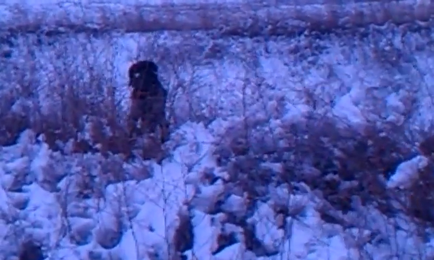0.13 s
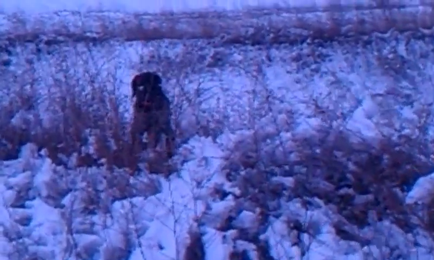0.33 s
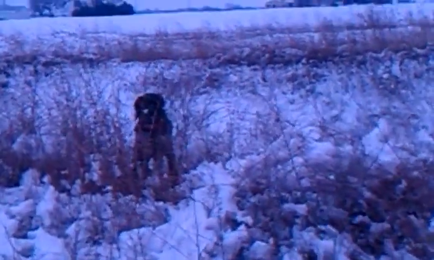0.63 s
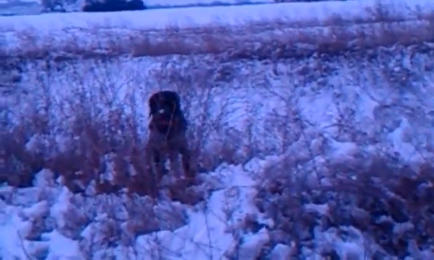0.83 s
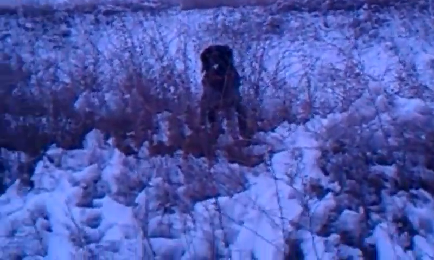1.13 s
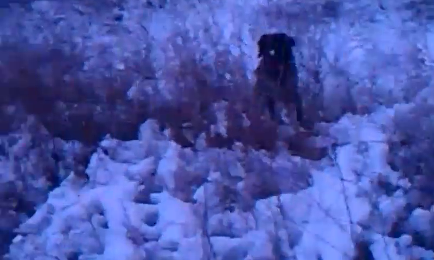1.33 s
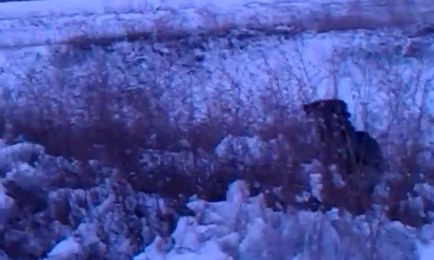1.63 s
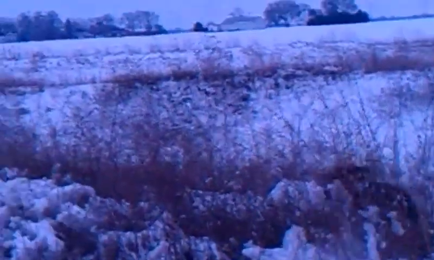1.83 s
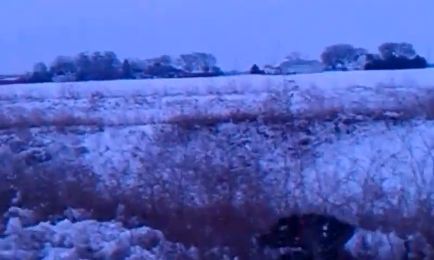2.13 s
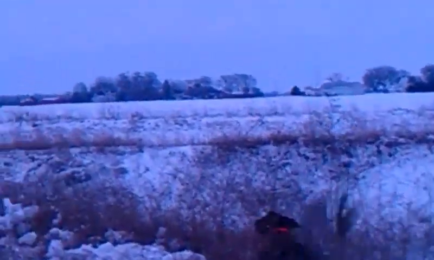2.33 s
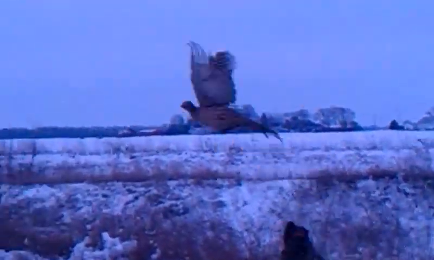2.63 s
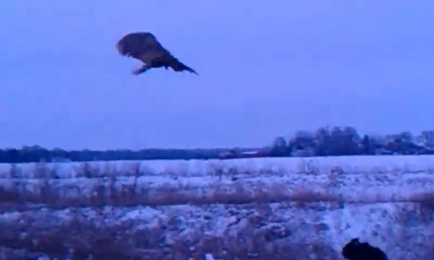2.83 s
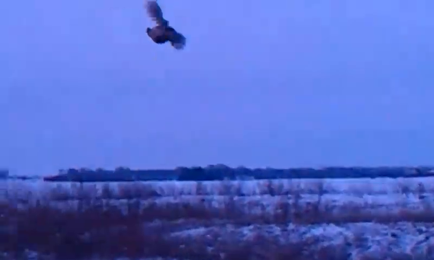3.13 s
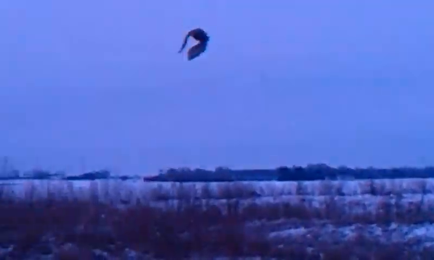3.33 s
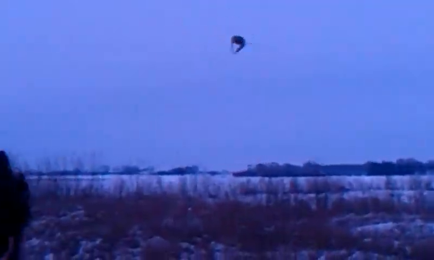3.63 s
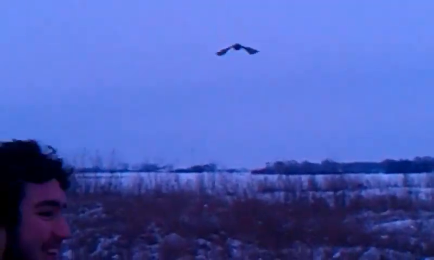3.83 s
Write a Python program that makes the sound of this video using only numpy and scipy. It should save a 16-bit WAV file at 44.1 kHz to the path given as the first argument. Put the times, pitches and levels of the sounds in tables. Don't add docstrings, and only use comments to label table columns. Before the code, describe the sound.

A pheasant's flush in an open field. Until 1.2 s, faint air hush, light rustling and a few dull knocks. From 1.2 to 2 s wings thrash dry stalks, with crackles and bright snaps, sharpest near 1.4 s. From about 1.85 s, rapid wingbeats, roughly fourteen per second, whistle in short falling chirps over low thumps. More brush rustles around 2.4-2.7 s; wingbeats fade by 3.5 s under buffeting microphone wind.

```python
import sys
import numpy as np
from scipy import signal
from scipy.fft import rfft, irfft
from scipy.io import wavfile
from scipy.ndimage import uniform_filter1d

SR = 44100
rng = np.random.default_rng(int(sys.argv[2]) if len(sys.argv) > 2 else 0)


def voltage_ratio(decibels):
    exponent = np.asarray(decibels, float) / 20
    return 10 ** exponent


def transcribe(signal):
    frames = np.atleast_2d(signal).T
    limited = np.clip(frames, -1, 1)
    pcm = np.round(limited * 32767).astype(np.int16)
    wavfile.write(sys.argv[1], SR, pcm)


N = 176400


def evened(x):
    return x / np.sqrt(np.mean(x ** 2) + 1e-20)


def curve(points):
    s, db = np.transpose(points)
    return voltage_ratio(np.interp(np.arange(N) / SR, s, db))


def colour(x, points):
    f, db = np.transpose(points)
    log_hz = np.log(np.fft.rfftfreq(N, 1 / SR) + 1)
    gain = voltage_ratio(np.interp(log_hz, np.log(f + 1), db))
    return evened(irfft(rfft(x) * gain, N))


def wander(span_s):
    size = max(int(span_s * SR), 2)
    return evened(uniform_filter1d(uniform_filter1d(rng.standard_normal(N), size), size))


def add(mix, s, sound):
    part = mix[max(round(s * SR), 0):][:len(sound)]
    part += sound[:len(part)]


def bursts(rows, rise_s, gain_db, order):
    out, t = np.zeros(N), np.arange(0, .2, 1 / SR)
    for s, db, length_s in rows:
        swell = np.minimum(t / rise_s, 1) * np.exp(-(t / length_s) ** order)
        add(out, s - rise_s / 2, voltage_ratio(db + gain_db) * swell)
    return out


# f/Hz, density/dB
AIR = [(18, -17), (30, 11.5), (103, 7), (311, -2.5), (1400, -6), (2500, -12.5), (4190, -18.5), (6500, -11),
       (8080, -27), (16000, -36)]
AIR_DB = -45.5


def hush():
    return voltage_ratio(AIR_DB + 1.0 * wander(0.011)) * colour(rng.standard_normal(N), AIR)


PATCH_DB = 2.5


def patchy(x):
    z = signal.stft(x, nperseg=256)[2]
    patches = rng.standard_normal(z.shape[::-1])
    patches = uniform_filter1d(uniform_filter1d(patches, size=5, axis=0), size=6, axis=1).T
    return evened(signal.istft(z * voltage_ratio(PATCH_DB * evened(patches)), nperseg=256)[1][:N])


# t/s, level/dB
STIR = [(0, -32), (.13, -40.5), (.45, -40), (.69, -30), (.82, -41), (1.1, -42), (1.2, -31.5), (1.26, -24),
        (1.6, -26), (2.03, -29), (2.18, -35.5), (2.36, -36.5), (2.42, -30), (2.6, -31.5), (2.8, -36.5),
        (3.2, -41), (3.4, -49.5), (4, -54)]
# t/s, level/dB, length/s
THRASH = [(1.224, -18, 0.024), (1.295, -13.5, 0.036), (1.388, -6.5, 0.046), (1.470, -3, 0.039),
          (1.548, -10.5, 0.057), (1.646, -10, 0.036), (1.728, -12.5, 0.029), (1.818, -10.5, 0.042),
          (1.900, -11, 0.033), (1.975, -14.5, 0.039), (2.378, -15.5, 0.049), (2.463, -10, 0.049),
          (2.540, -9.5, 0.047), (2.645, -12.5, .018), (2.722, -15, .015)]
# f/Hz, density/dB
RUSTLE = [(250, -18.5), (538, -10.5), (1610, -7), (2400, -14), (4190, -8), (6300, -1), (8260, 0),
          (10800, -5), (12000, -10), (16000, -13)]
THRASH_DB, THRASH_RISE_S = -15, 0.008
CRACKLES_PER_S, CRACKLE_SPREAD_DB, CRACKLE_SHARE = 3000, 3.5, .7


def brush():
    spread_db = CRACKLE_SPREAD_DB * np.minimum(rng.exponential(1, N), 4)
    size = voltage_ratio(spread_db) * (rng.random(N) < CRACKLES_PER_S / SR)
    kind, t, grains = rng.integers(0, 16, N), np.arange(200) / SR, np.zeros(N)
    for k, hz in enumerate(np.geomspace(900, 14000, 16)):
        grain = np.sin(2 * np.pi * hz * t) * np.exp(-t * (900 + hz / 8)) * np.sqrt(hz)
        grains += signal.oaconvolve(size * (kind == k), grain)[:N]
    crackle, hiss = evened(grains), rng.standard_normal(N)
    flutter = voltage_ratio(1.8 * wander(0.002) + .4 * wander(0.029))
    soft = patchy(colour(CRACKLE_SHARE / 3 * crackle + hiss, RUSTLE))
    sharp = patchy(colour(CRACKLE_SHARE * crackle + hiss, RUSTLE))
    beats = bursts(THRASH, THRASH_RISE_S, THRASH_DB, order=4)
    return flutter * (soft * curve(STIR) + sharp * beats)


# t/s, level/dB, f/Hz
KNOCKS = [(0.029, -25, 370), (0.317, -29, 468), (0.485, -27, 476), (0.769, -26, 850), (1.042, -26.5, 790),
          (1.302, -21, 757), (1.391, -17.5, 1630), (1.615, -22.5, 1560), (1.667, -25, 975),
          (1.739, -22.5, 1190)]


def knocks():
    out, t = np.zeros(N), np.arange(0, .03, 1 / SR)
    for s, db, hz in KNOCKS:
        shape = np.minimum(t / 0.0018, 1) * np.exp(-t / 0.0042)
        noise = uniform_filter1d(rng.standard_normal(len(t)), size=14)
        add(out, s, voltage_ratio(db) * shape * (np.sin(2 * np.pi * hz * t) + 1.5 * noise))
    return out


# t/s, level/dB
WIND = [(0, -66), (.3, -62), (.4, -42), (.68, -30), (.95, -46.5), (1.35, -43), (1.72, -40), (1.8, -28.5),
        (2.13, -40), (2.28, -18.5), (2.55, -19.5), (2.7, -20), (2.93, -18.5), (3.18, -36), (3.3, -17),
        (3.8, -19), (3.92, -42), (4, -43)]
# f/Hz, density/dB
BUFFET = [(12, -40), (20, -7), (86, 4.5), (240, 0), (420, -8), (700, -20.5), (1180, -46), (2500, -91),
          (3250, -103), (5500, -120)]
# t/s, level/dB, length/s
PUFFS = [(0.364, -27, 0.014), (0.613, -36, 0.02), (0.68, -27.5, 0.034), (1.008, -30, 0.027),
         (1.769, -26, 0.022), (2.274, -25.5, 0.016), (2.3, -24, 0.022), (2.369, -12, 0.013),
         (2.384, -7, 0.017), (2.424, -14, 0.039), (2.513, -8.5, 0.025), (2.571, -17, 0.031),
         (2.599, -17.5, 0.032), (2.748, -12.5, 0.032), (2.864, -6, 0.011), (2.896, -14, 0.01),
         (2.923, -22, 0.016), (2.943, -23, 0.017), (2.959, -18, 0.028), (3.25, -21, 0.03),
         (3.283, -10.5, 0.019), (3.323, -12.5, 0.024), (3.361, -11.5, 0.034), (3.4, -8, 0.016),
         (3.437, -9, 0.019), (3.471, -6.5, 0.019), (3.527, -17, 0.025), (3.546, -12, 0.021),
         (3.587, -16, 0.03), (3.624, -16.5, 0.021), (3.666, -13.5, 0.027), (3.718, -11, 0.012),
         (3.759, -30, 0.012), (3.78, -21, 0.014), (3.8, -20.5, 0.024), (3.86, -28.5, 0.021),
         (3.989, -26.5, 0.016)]
PUFF_DB, PUFF_BRIGHT, PORT_LIMIT = -7, 4.5, .3


def wind():
    bed = colour(rng.standard_normal(N) * voltage_ratio(3.2 * wander(0.0043)), BUFFET)
    bright = evened(bed + PUFF_BRIGHT * np.gradient(bed) * 10)
    push = bed * voltage_ratio(-8 + 2.0 * wander(0.0098)) * curve(WIND)
    push = push + bright * bursts(PUFFS, 0.0085, PUFF_DB, order=3)
    limited = np.tanh(push / PORT_LIMIT)
    return colour(limited, [(12, -0.5), (900, -3.5), (1400, -6), (16000, -74)]) * np.std(push)


# t/s, level/dB, centre f/Hz, decay/s
SNAPS = [(0.8704, -13.5, 8290, 0.0007), (1.2844, -8, 8540, 0.00061), (1.39, -28, 6650, 0.00051),
         (1.4004, -11, 8440, 0.0007), (1.421, 9, 8080, 0.00082), (1.477, -1, 8500, 0.0011),
         (1.4818, 2, 8400, 0.001), (1.5604, -11, 7950, 0.0008), (1.5754, 3, 8700, 0.00088),
         (1.7389, -5, 8400, 0.0007), (1.944, -18, 8080, 0.00081), (2.0034, -3.5, 7750, 0.00082),
         (2.0124, -23, 7800, 0.00058), (2.028, -8.5, 6800, 0.00075), (2.0986, -11, 8230, 0.00083),
         (2.1535, -21, 6850, 0.0007), (2.1859, -28, 3430, 0.00053), (2.2364, -11.5, 6950, 0.0007),
         (2.3296, -27, 3360, 0.00029), (2.38, -5, 7940, 0.0007), (2.5176, -9, 7100, 0.00078),
         (2.5401, -11, 7990, 0.0007), (2.7252, -15, 6940, 0.0007), (3.5508, -24, 4130, 0.00098),
         (3.7706, -10, 7870, 0.00099), (3.879, -40, 3240, 0.0007), (3.897, -37, 3480, 0.0007)]
# t/s, level/dB, centre f/Hz, decay/s
SCRAPES = [(1.4562, -9, 8600, .004), (1.9651, -9, 7900, .003), (1.9195, -5, 12000, .002),
           (0.8705, -20, 13000, .002), (3.7702, -14, 3200, .0008), (3.7703, -16, 5500, .0006),
           (3.097, -21, 7500, .0015), (2.612, -15, 7500, .002), (1.3912, -5, 7000, .0015),
           (1.8245, -7, 7300, .003), (2.4932, -6, 8600, .0006)]
SNAP_DB, SNAP_MAX_DB = -3, -4


def twigs():
    out, t = np.zeros(N), np.arange(0, .03, 1 / SR)
    for s, db, hz, decay_s in [*SNAPS, *SCRAPES]:
        band = signal.butter(1, [0.65 * hz, min(1.35 * hz, 16000)], "band", fs=SR)
        snap = np.exp(-t / max(decay_s, 2e-4)) * signal.lfilter(*band, rng.standard_normal(len(t)))
        add(out, s, voltage_ratio(min(db, SNAP_MAX_DB) + SNAP_DB) * snap / abs(snap).max())
    return out


# multiple of stroke f, level/dB
FEATHERS = [(4, -8), (5, 2.5), (6, -36), (9, 0.5), (11, -10), (12, 3)]
FLUSH_S = 1.8514
STROKE_HZ, UP_HZ, STROKE_S = 743, 796, 0.0089
WHOOSH_DB, UP_WHOOSH_DB = -18, -9
RAGGED, SAG = .25, .19
THUMP_SHARE, THUMP_SAG_PER_S = 0.97, .1
DULL_DB_PER_S = -3


def stroke(s, hz, whistle_db, thump_db, air_db=WHOOSH_DB):
    flown_s = s - FLUSH_S
    u = np.arange(0, 1, 1 / (STROKE_S * SR))
    draw = rng.random(9)
    turn = 2 * np.pi * np.cumsum(hz * (1 + 0.096 * (draw[0] - .5)) * (1 - SAG * u)) / SR
    whistle = np.zeros(len(u))
    for (k, db), p in zip(FEATHERS, draw[1:]):
        partial_db = db - 9 + 5.0 * (p - .5) + DULL_DB_PER_S * flown_s * (k > 6)
        whistle += voltage_ratio(partial_db) * np.sin(k * turn + 2 * np.pi * p)
    band = signal.butter(1, [1000, 5500], "band", fs=SR)
    air = voltage_ratio(air_db) * 2 * signal.lfilter(*band, rng.standard_normal(len(u)))
    rough = 1 + RAGGED * 4 * uniform_filter1d(rng.standard_normal(len(u)), size=30)
    thump_turn = (THUMP_SHARE - THUMP_SAG_PER_S * flown_s) * turn * STROKE_HZ / hz
    thump = voltage_ratio(thump_db) * np.sin(thump_turn)
    shape = np.sin(np.pi * u ** 0.57) ** 1.4
    return voltage_ratio(whistle_db) * shape * (0.69 * whistle * rough + air + thump)


# t/s, whistle level/dB, thump re whistle/dB
DOWN = [(1.8514, -14, -11.5), (1.921, -16, -8.5), (1.9909, -14, -8), (2.0619, -12.5, -5),
        (2.1337, -13.5, -15), (2.2045, -16, -22), (2.2752, -14.5, -9.5), (2.3472, -18, -10),
        (2.4189, -21, -4), (2.4907, -25, -21), (2.5631, -25, 0), (2.6354, -20, -28), (2.7097, -25.5, -12),
        (2.7806, -23.5, -3), (2.8534, -22, -7), (2.9277, -27, -20), (3.001, -26.5, -14),
        (3.0749, -30.5, -7), (3.1494, -32, -16), (3.2218, -29, -17), (3.2958, -32, -24), (3.3695, -30, -22),
        (3.4454, -37.5, -27), (3.5209, -55, -16), (3.6124, -43, -7), (3.689, -39, -22.5), (3.837, -41, -13),
        (3.9105, -39.5, -16)]
# t/s, whistle level/dB, thump re whistle/dB
UP = [(1.7074, -35.5, 7.5), (1.7988, -26, -9), (2.0424, -23, -4), (2.6744, -34, 9), (2.7444, -22.5, 2.5),
      (2.8165, -23, -0.5), (2.8908, -25, 4.5), (2.9652, -29, -1), (3.0395, -26.5, 5), (3.1138, -24.5, 2),
      (3.1344, -36, 4.5), (3.1872, -24.5, -4.5), (3.2094, -40, 13.5), (3.2655, -32, -11),
      (3.3403, -35.5, -15)]
LAG_S, SECOND_DB, SECOND_GAIN_DB_PER_S = 0.016, -17, 10


def wings():
    out = np.zeros(N)
    for s, db, thump_db in DOWN:
        add(out, s - .001, stroke(s, STROKE_HZ, db, thump_db))
        second_db = min(SECOND_DB + SECOND_GAIN_DB_PER_S * (s - FLUSH_S), -3)
        add(out, s + LAG_S, stroke(s, STROKE_HZ, db + second_db, -6.5))
    for s, db, thump_db in UP:
        add(out, s - .001, stroke(s, UP_HZ, db, thump_db, UP_WHOOSH_DB))
    return out


def scene():
    return (hush() + brush() + knocks() + wind() + twigs() + wings())[None]


# f/Hz, level/dB
STARVE = [(1200, -56), (2400, -44), (3600, -51.5), (5200, -51.5), (6500, -61), (8000, -58.5),
          (11000, -52.5), (15500, -44)]
# f/Hz, level/dB
THIN = [(1500, -30), (2400, -14), (3400, -16), (4300, -7), (5600, -2), (6500, -10), (9500, -9), (11800, -6),
        (16000, -16)]
STARVE_SLOPE, EDGE_HZ = 1.7, 15780


def starve(x):
    hz, _, z = signal.stft(x, SR, "cosine", nperseg=2048)
    line_hz = hz[:, None]
    power = abs(z) ** 2
    padded = np.vstack([power, power[-15:]])
    band = np.repeat(padded.reshape(65, 16, -1).mean(1), 16, 0)[:1025]
    jitter_db = np.repeat(rng.standard_normal((power.shape[1], 65)).T, 16, 0)[:1025]
    loud_db = 10 * np.log10(power.sum(0) + 1e-12) + 25
    limit_db = np.interp(line_hz, *np.transpose(STARVE)) - 28 + STARVE_SLOPE * loud_db + 2.8 * jitter_db
    thin_db = 2 * np.interp(line_hz, *np.transpose(THIN)) + 6.0 * jitter_db
    thin = power[300:480].mean(0) * voltage_ratio(thin_db)
    strong = (band > voltage_ratio(2 * limit_db)) & (power > thin)
    onset = band > 30 * np.roll(band, 2, axis=1)
    keep = strong | onset | (line_hz < 1200)
    return signal.istft(z * keep * (line_hz < EDGE_HZ), SR, "cosine", nperseg=2048)[1][:N]


# f/Hz, width/Hz, level/dB
MIC = [(2520, 560, -1), (3246, 1120, 5), (5680, 655, -3.5), (8230, 280, 2.5)]


def microphone(x):
    hz = np.fft.rfftfreq(N, 1 / SR)
    mic_db = sum(db * np.exp(-((hz - f) / w) ** 2) for f, w, db in MIC)
    return irfft(rfft(x) * voltage_ratio(mic_db), N)


def top_cut(x):
    return signal.sosfilt(signal.butter(12, 16520, fs=SR, output="sos"), x)


def record(dry):
    mix = starve(microphone(dry[0]))[None]
    return top_cut(mix)


dry = scene()
out = record(dry)
transcribe(out)
```